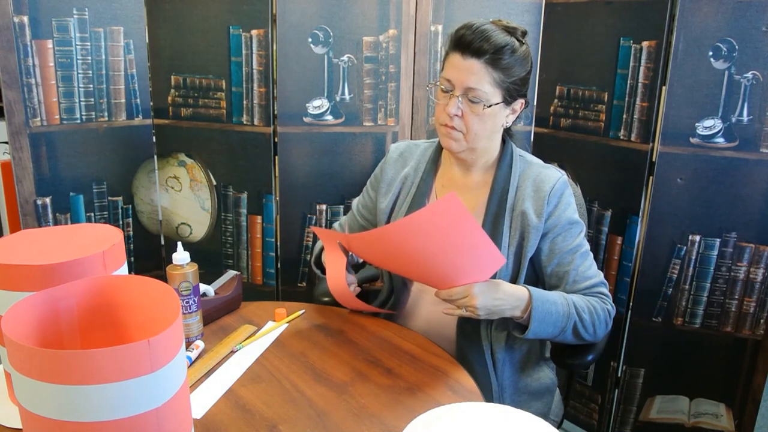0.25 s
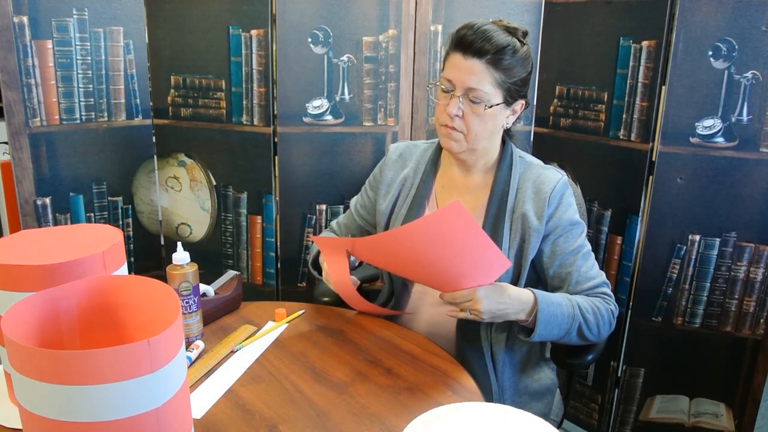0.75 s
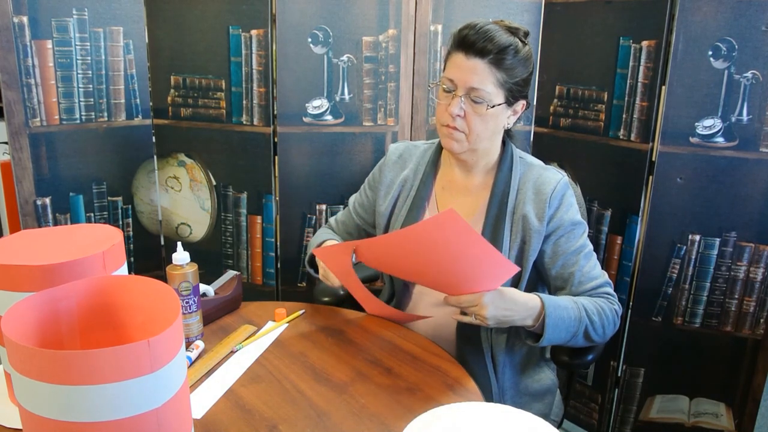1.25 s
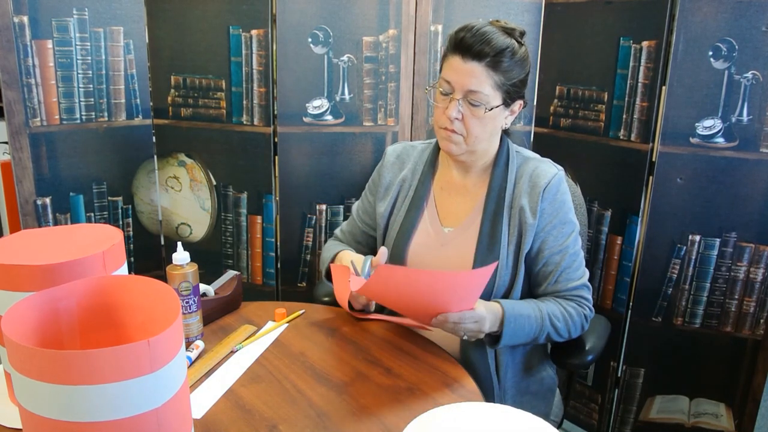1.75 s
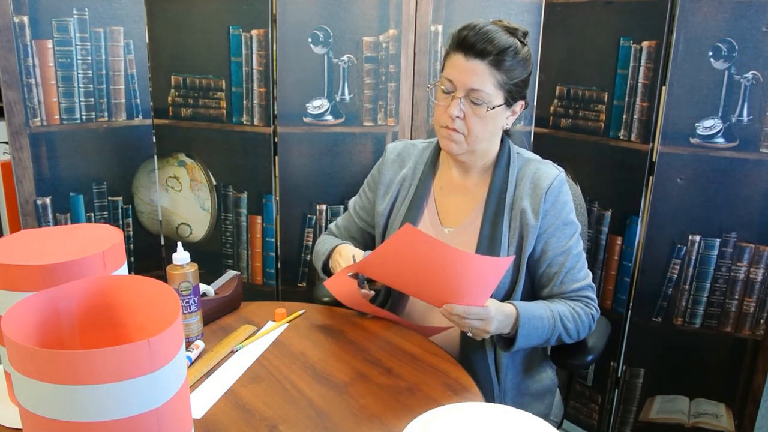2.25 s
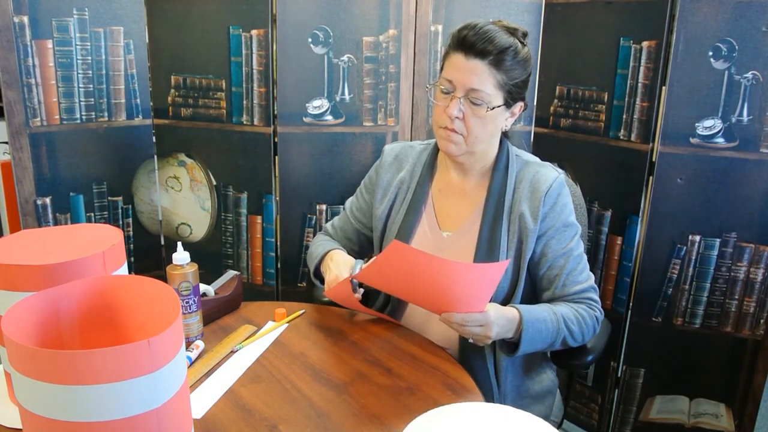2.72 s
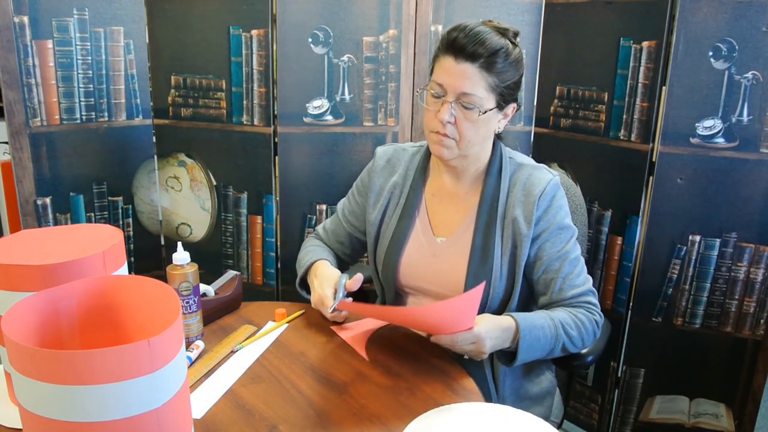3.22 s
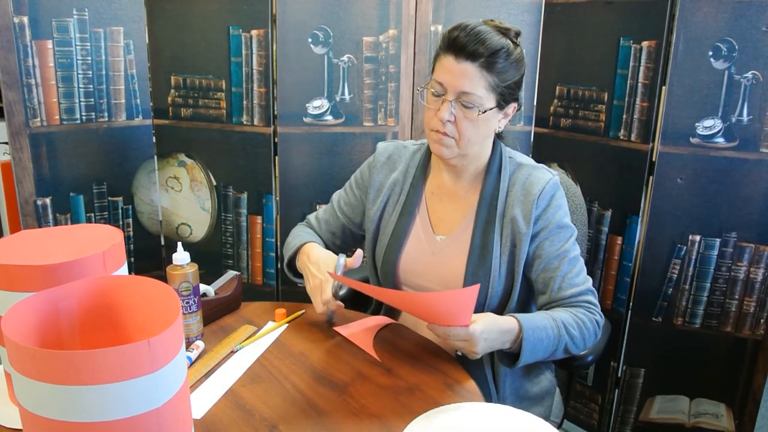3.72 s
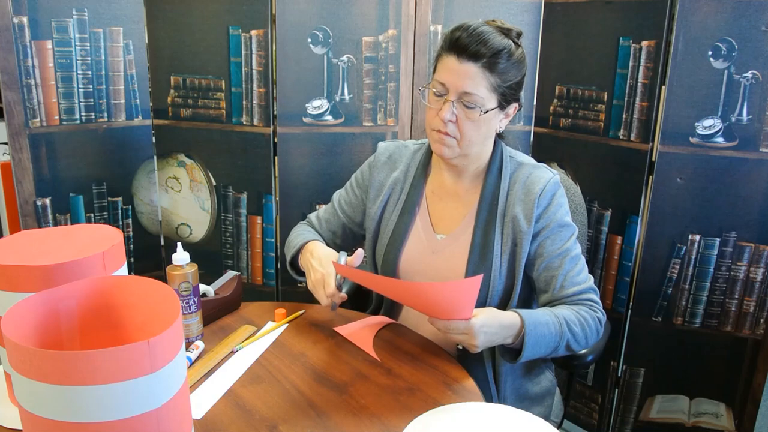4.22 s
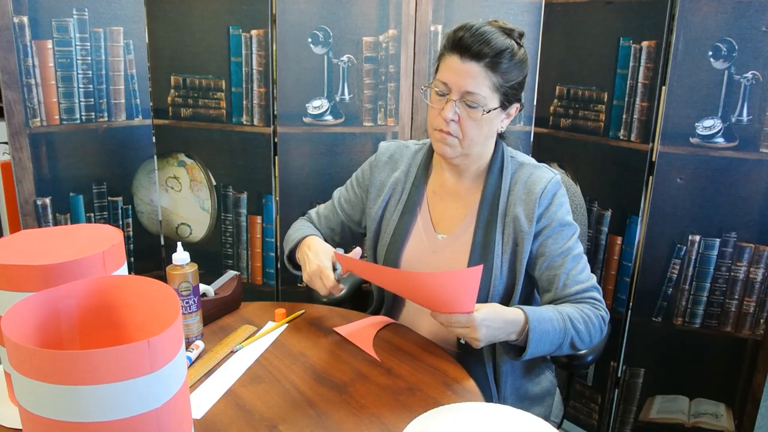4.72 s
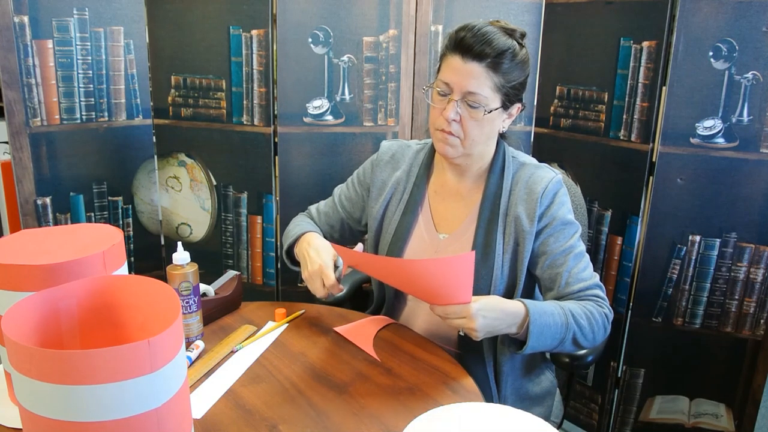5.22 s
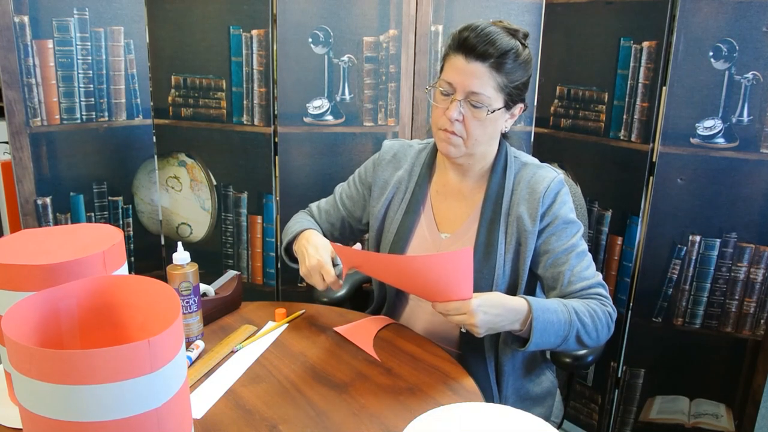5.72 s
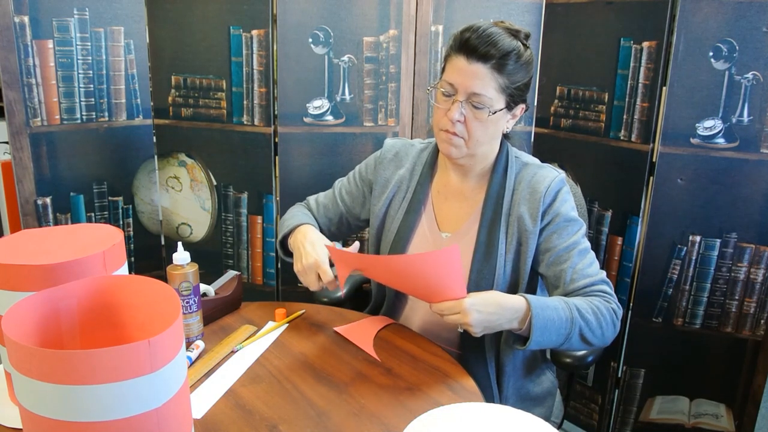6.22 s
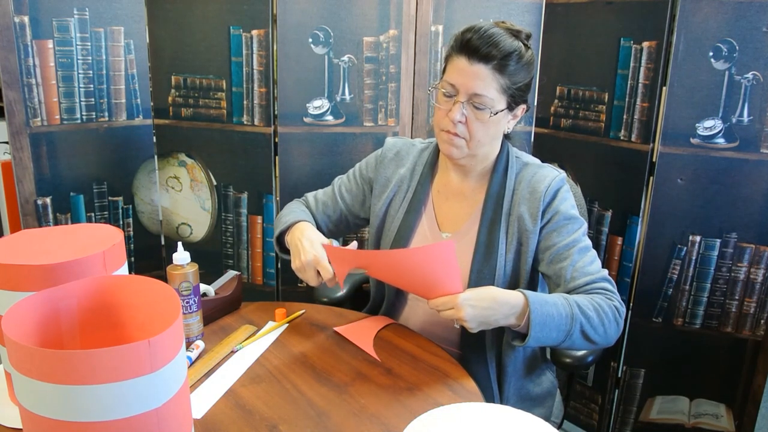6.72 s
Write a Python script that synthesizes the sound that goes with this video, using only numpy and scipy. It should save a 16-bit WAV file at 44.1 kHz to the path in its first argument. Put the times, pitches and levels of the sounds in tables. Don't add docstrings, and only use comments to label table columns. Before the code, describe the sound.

Irregular snipping through thick paper, each bite a dense rasp of tiny ticks with a papery ring. The sheet pops, flexes and bumps between cuts; a strong snap near the middle frees a piece, which rubs hollowly on the table. After a lull with only faint snips and a distant hum, the scissors clack shut and cutting resumes. Small room, short reflections, low background hush, nearby stereo microphone.

```python
import sys
import numpy as np
from scipy import signal
from scipy.fft import rfft, irfft
from scipy.io import wavfile
from scipy.ndimage import uniform_filter1d

SR = 44100
rng = np.random.default_rng(int(sys.argv[2]) if len(sys.argv) > 2 else 0)


def store_wav(level_fs):
    pcm = np.round(np.clip(np.atleast_2d(level_fs), -1, 1) * 32767)
    wavfile.write(sys.argv[1], SR, pcm.T.astype(np.int16))


def rack_gain(trim_db):
    fader = np.asarray(trim_db, float)
    return 10 ** (fader / 20)


N = 306936


def evened(x):
    return x / np.sqrt(np.mean(x ** 2) + 1e-20)


def read(points, hz):
    f, value = np.transpose(points)
    return np.interp(np.log(hz + 1), np.log(f + 1), value)


def columns(rows):
    s, *values = np.transpose(rows)
    return [np.interp(np.arange(N) / SR, s, v) for v in values]


def add(mix, s, sound):
    part = mix[round(s * SR):][:len(sound)]
    part += sound[:len(part)]


def band(x, lo_hz, hi_hz):
    sos = signal.butter(3, [lo_hz, min(hi_hz, SR * .45)], "band", fs=SR, output="sos")
    return evened(signal.sosfilt(sos, x))


def ring(x, hz, width):
    return signal.lfilter(*signal.iirpeak(hz, hz / width, SR), x)


def resonate(x, hz, width):
    turn = np.exp(2j * np.pi * np.cumsum(hz * np.ones(len(x))) / SR)
    r = np.exp(-np.pi * width / SR)
    return 2 * (turn * signal.lfilter([1 - r], [1, -r], x / turn + 1e-18)).real


def wander(seconds):
    span = max(round(seconds * SR), 1)
    return evened(uniform_filter1d(uniform_filter1d(rng.standard_normal(N), span), span))


# frequency in Hz, density in dB per Hz.
CARD = [(150, -23), (380, -12.5), (700, -7.5), (1400, -5.5), (2500, -3), (6300, -10.5), (13000, -14.5),
        (15500, -26.5)]
# frequency in Hz, width in Hz, level in dB.
RINGS = [(642, 40, 10), (780, 40, 0), (1090, 50, -7), (1425, 50, -1), (1950, 200, -9), (2500, 200, -16),
         (5000, 300, -8), (7600, 500, -4)]


def cutting(per_s=9000, spread_db=2.5, clump_db=1.26, lurch_db=-0.52, wide=2.5, lag=0.89):
    size = rack_gain(spread_db * np.minimum(rng.exponential(1, N), 4.5)) * rng.choice([-1., 1.], N)
    clumps = rack_gain(clump_db * wander(0.0047) + lurch_db * wander(0.063))
    left = size * (rng.random(N) < per_s / SR) * clumps
    at = np.arange(N) + np.round(wide * rng.standard_normal(N) - lag).astype(int)
    right = np.bincount(np.clip(at, 0, N - 1), left, N)
    ticks = np.array([left, right])
    ringing = ticks + sum(rack_gain(db) * ring(ticks, hz, width) for hz, width, db in RINGS)
    colour = rack_gain(read(CARD, np.fft.rfftfreq(N, 1 / SR)))
    parts = split(rfft(flexed(ringing)) * colour)
    return rack_gain(-2.5) * sum(gain * part for gain, part in zip(pressure(), parts))


def flexed(x, patchy_db=1.5):
    z = signal.stft(x, nperseg=256)[2]
    patches = rng.standard_normal(z.shape[1:])
    patches = evened(uniform_filter1d(uniform_filter1d(patches, size=4, axis=0), size=28, axis=1))
    return signal.istft(z * rack_gain(patchy_db * patches), nperseg=256)[1][:, :N]


PARTS_HZ = [1000, 3350, 6300]


def split(spectrum):
    hz = np.fft.rfftfreq(N, 1 / SR)
    below = [0] + [1 / (1 + (hz / edge) ** 10) for edge in PARTS_HZ] + [1]
    return [evened(irfft(spectrum * (hi - lo), N)) for lo, hi in zip(below, below[1:])]


# bite in seconds, length in seconds, level in dB,
# change over the stroke in dB, brightness in dB.
STROKES = [(0.009, 0.091, -41, 2.5, 6), (0.462, 0.41, -43, -4.5, 2.5), (.95, 0.037, -42.5, -5.5, -3.5),
           (1.005, 0.22, -44, -1.5, 0), (1.285, 0.051, -47, -3.5, 10), (1.456, 0.2, -52, 5.5, 5.5),
           (1.606, 0.26, -41.5, -5, 3), (1.996, 0.1, -48.5, -0.5, 4), (2.33, 0.25, -44, -4.5, 3),
           (2.65, 0.18, -51, 3.5, 1), (2.884, 0.031, -55, 4.5, 2), (4.091, .2, -54.5, 2, -1),
           (4.324, 0.18, -51, 2.5, 1.5), (4.604, 0.15, -50.5, 5.5, 1.5), (5.082, .04, -60, 9.5, 3.5),
           (5.164, 0.13, -47, -3.5, 6), (5.451, 0.18, -51.5, -0.5, 4.5), (5.597, 0.18, -43, 4, 0),
           (5.881, 0.018, -44, 5, -2), (5.942, 0.096, -37, -7.5, -2), (6.136, 0.18, -47, 5.5, 2),
           (6.54, 0.071, -46, 6.5, 0.5), (6.592, 0.19, -41, 0.5, -1), (6.849, 0.12, -37.5, -2, -0.5)]
# start in seconds, level in dB,
# fading in dB per second, brightness in dB, boom in dB.
BRUSHES = [(0.198, -48, 152, 3, -7), (0.225, -44.5, 263, 4.5, -6), (.526, -38, 250, -1.5, -27),
           (.8, -47, 40, 0, -3), (1.04, -58, 45, 0, 9), (1.424, -60, 126, 4, 15),
           (1.853, -27.5, 314, -9, -2), (2.225, -55, 206, 0, -4), (2.951, -36.5, 228, -5.5, -3.5),
           (3.135, -52.5, 86, 6, -10), (3.178, -41, 235, 2.5, -9), (3.299, -52.5, 96, 1, 0.5),
           (3.503, -42.5, 198, -6.5, -9.5), (3.748, -65, 370, 10.5, 12), (3.875, -57.5, 250, 7.5, 7),
           (4.929, -46.5, 350, 2.5, -11), (5.142, -38, 260, 4.5, -9.5), (5.826, -42.5, 217, -2.5, -4.5),
           (6.452, -51.5, 152, -3, 0), (6.486, -45.5, 500, 1.5, -7), (4.55, -49.5, 62, -1, -15),
           (.905, -55.5, 5, 3.5, -6), (2.28, -50.5, 60, 1.5, -18), (6.58, -50.5, 21, -8, 7)]


def pressure(bite_db_per_s=596, let_go_db_per_s=299, touch_db_per_s=1192, stroke_boom_db=-7):
    t = np.arange(0, N / SR + .002, .001)
    shapes = []
    for s, length, db, change_db, bright_db in STROKES:
        level_db = db + change_db * np.clip((t - s) / length, 0, 1)
        level_db -= bite_db_per_s * np.maximum(s - t, 0)
        level_db -= let_go_db_per_s * np.maximum(t - s - length, 0)
        shapes.append((level_db, bright_db, stroke_boom_db))
    for s, db, fading, bright_db, boom_db in BRUSHES:
        level_db = db - touch_db_per_s * np.maximum(s - t, 0) - abs(fading) * np.maximum(t - s, 0)
        shapes.append((level_db, bright_db, boom_db))
    power = 0
    for level_db, bright_db, boom_db in shapes:
        parts_db = [[boom_db], [0], [0.08 + bright_db], [1.5 + 1.23 * bright_db]]
        power = power + rack_gain(level_db + np.array(parts_db)) ** 2
    return [np.interp(np.arange(N) / SR, t, np.sqrt(p)) for p in power]


# start in seconds, peak in dB, knock in dB re the crack, fizz in dB re the crack.
SNAPS = [(1.004, -15, -24, -16), (0.4518, -18, -36, -21), (0.478, -12.5, -25, -4), (0.5254, -9.5, -39, -11),
         (0.9274, -14.5, -24, -15), (0.9482, -15, -36, -11), (1.122, -17, -30, -19),
         (1.5554, -14, -13, -13), (1.999, -26, -20, -23), (2.0507, -12, -20.5, -12), (2.221, -18, -30, -8),
         (2.228, -21.5, -33, -4), (2.394, -30, -13, -4), (2.8145, -26, -26, 2.5), (2.8997, -22, -14, -7),
         (2.9479, -8, -14, -12), (3.1694, -5.5, -17.5, -15), (3.7445, -32, -16, -6), (4.0907, -35, -20, -5),
         (4.596, -15, -33, -11), (4.923, -23, -34, -8), (5.9825, -12, -16, -20), (5.9352, -12, -12, -7.5),
         (5.595, -15.5, -17, -7), (5.627, -21, -29, 0), (5.643, -11.5, -18, -7.5),
         (6.0145, -13.5, -12, -12), (6.4517, -19.5, -22, -10), (6.4827, -24, -16, -0.5),
         (6.6562, -22, -17, -6)]


def snaps():
    out, t = np.zeros(N), np.arange(4000) / SR
    shape = np.minimum(t / 0.00096, 1) * (rack_gain(-60 * t / 0.0062) + 0.21 * rack_gain(-60 * t / 0.046))
    for s, db, knock_db, fizz_db in SNAPS:
        z = rng.standard_normal(4000)
        crack = band(z, 2200, 7000)
        fizz = rack_gain(fizz_db + 6) * band(z, 7000, 11100)
        knock = rack_gain(knock_db + 12.0) * band(z, 370, 1110)
        add(out, s, rack_gain(db - 14.5) * (crack + fizz + knock) * shape)
    return out


# start in seconds, peak in dB, ring in Hz, t60 in seconds.
KNOCKS = [(.082, -10.5, 540, 0.023), (0.947, -31, 2393, 0.094), (1.411, -40, 330, 0.07),
          (1.43, -37.5, 636, 0.13), (1.847, -20.5, 607, 0.08), (1.848, -22, 1880, 0.039),
          (1.866, -44, 2920, 0.041), (2.949, -35, 450, 0.037), (2.95, -33, 854, 0.22),
          (3.17, -19, 1310, 0.017), (3.17, -34.5, 145, 0.2), (3.172, -28, 730, 0.051),
          (3.19, -35, 283, 0.093), (5.601, -38, 1410, 0.19), (6.575, -36.5, 1302, 0.3),
          (6.19, -43, 250, 0.15), (6.451, -30.5, 2380, 0.019), (6.484, -25, 2366, 0.025),
          (6.87, -25, 2490, 0.056), (6.894, -23, 2400, 0.042), (6.87, -31, 634, 0.22)]
# start in seconds, peak in dB, ring in Hz, t60 in seconds.
CLACK = [
    (5.1336, -7.5, 4300, .011),
    (5.1336, -7, 8200, .013),
    (5.1337, -14, 2500, .012),
    (5.134, -15, 10500, .014),
]


def knocks():
    out, t = np.zeros(N), np.arange(9000) / SR
    for s, db, hz, t60 in KNOCKS + CLACK:
        t60 = max(t60, .005)
        z = rng.standard_normal(9000)
        rattle = 0.48 * band(z, 0.61 * hz, 1.81 * hz) * np.minimum(t / 0.0027, 1)
        swing = .7 * np.sin(2 * np.pi * hz * t) * rack_gain(-30 * t / t60)
        onset = np.minimum(t * hz / 1.73, 1)
        add(out, s, rack_gain(db - 60 * t / t60) * (swing + rattle) * onset)
    return out


# time in seconds, level in dB, resonance in Hz.
SCRAPE = [(3.25, -56, 463), (3.29, -48, 448), (3.32, -62, 433), (3.35, -46, 378), (3.4, -48.5, 316),
          (3.45, -51.5, 302), (3.52, -54, 346), (3.57, -63, 298), (3.63, -98, 280)]


def scrape(per_s=66, uneven=.25):
    level_db, hz = columns(SCRAPE)
    slip_count = np.floor(np.cumsum(per_s * (1 + uneven * wander(.02))) / SR)
    slips = np.diff(slip_count, prepend=0) > 0
    drive = slips * rack_gain(1.5 * wander(.01)) + .03 * rng.standard_normal(N)
    t = np.arange(N) / SR
    on = np.clip(np.minimum(t - SCRAPE[0][0], SCRAPE[-1][0] - t) / .02, 0, 1)
    return on * rack_gain(level_db) * evened(resonate(resonate(drive, hz, 130), hz, 270))


# time in seconds, level in dB, pitch in Hz.
DRONE = [(3.85, -78, 129), (4.05, -67.5, 136.5), (4.3, -65.5, 137), (4.6, -68, 137), (4.8, -65.5, 134.2),
         (5.05, -65, 140), (5.2, -82, 140)]


def drone():
    level_db, hz = columns(DRONE)
    tone = np.sin(2 * np.pi * np.cumsum(hz + 2.84 * wander(0.0656)) / SR)
    return np.sqrt(2) * rack_gain(level_db + 3.5 * wander(0.018)) * tone


# delay in seconds, level in dB.
ECHOES = [(.0005, -11.5), (.0017, -15), (.0062, -7.5), (.0085, -10.5), (0.0145, -14.5)]
# frequency in Hz, t60 in seconds.
ROOM = [(200, 0.27), (1000, 0.32), (4000, 0.13), (12000, 0.043)]


def answer(wet_db=-5):
    taps = np.zeros((2, SR // 3))
    at = np.arange(200, SR // 3 - 20, 20) + rng.integers(0, 20, (2, (SR // 3 - 201) // 20))
    np.put_along_axis(taps, at, rng.choice([-1., 1.], at.shape), 1)
    hz, t, z = signal.stft(taps, SR, nperseg=256)
    decay = rack_gain(-60 * t / read(ROOM, hz)[:, None])
    tail = signal.istft(z * decay, SR, nperseg=256)[1]
    paths = rack_gain(wet_db) * tail / np.linalg.norm(tail[0])
    paths[:, 0] += 1
    reach = rng.uniform(.75, 1.3)
    for (s, db), apart in zip(ECHOES, rng.integers(0, 14, (len(ECHOES), 2))):
        paths[[0, 1], round(s * reach * SR) + apart] += rack_gain(db)
    return paths / np.linalg.norm(paths[0])


def room(x, turns_per_s=1.3):
    turn = np.pi * turns_per_s * np.arange(N) / SR
    shares = [np.sqrt(2 / 5) * abs(np.cos(turn + k * np.pi / 5)) for k in range(5)]
    direct_loss = sum(shares) * 0.7
    return sum(signal.oaconvolve(x * share / direct_loss, answer(), axes=1)[:, :N] for share in shares)


# frequency in Hz, density in dB per Hz.
HUSH = [(20, -34), (58, 16), (95, 1), (600, -1.5), (950, -4.5), (7500, -12.5), (15000, -12), (16500, -15.5)]
# frequency in Hz, left-right likeness from -1 to 1.
HUSH_SAME = [(60, 0.72), (180, 0.14), (550, 0.41), (1650, 0.048), (4970, -0.15), (15000, -0.15)]


def hush(level_db=-54.5, patchy_db=1.5):
    frames, hz = N // 256 + 5, np.fft.rfftfreq(1024, 1 / SR)
    a, b, c, d, patches = rng.standard_normal((frames, 513, 5)).T
    patches = evened(uniform_filter1d(uniform_filter1d(patches, 8, 0), 14, 1))
    same = np.clip(read(HUSH_SAME, hz), -1, 1)[:, None]
    left = a + 1j * b
    right = same * left + np.sqrt(1 - same ** 2) * (c + 1j * d)
    z = np.array([left, right]) * rack_gain(read(HUSH, hz)[:, None] + patchy_db * patches)
    noise = signal.istft(z, nperseg=1024, noverlap=768)[1][:, :N]
    return rack_gain(level_db + 3.0) * evened(noise)


def scene():
    table = cutting() + snaps() + knocks() + scrape() + drone()
    return rack_gain(1.0) * room(table) + hush()


def band_limit(x):
    return signal.sosfilt(signal.butter(12, 16670, fs=SR, output="sos"), x)


# frequency in Hz, left minus right in dB.
LEAN = [(30, 3.5), (100, 1.5), (300, 3), (700, 0.5), (2400, 0.6), (4400, 4), (8100, 6.5), (13000, 2.5)]


def record(dry):
    hz = np.fft.rfftfreq(N, 1 / SR)
    lean = read(LEAN, hz) / 2
    bass_loss = hz ** 2 / (hz ** 2 + 35 ** 2)
    passed = bass_loss * np.where(hz < 15850, 1, rack_gain(-45))
    heard = irfft(rfft(dry) * rack_gain(np.array([lean, -lean])) * passed, N)
    return band_limit(heard)


dry = scene()
out = record(dry)
store_wav(out)
```